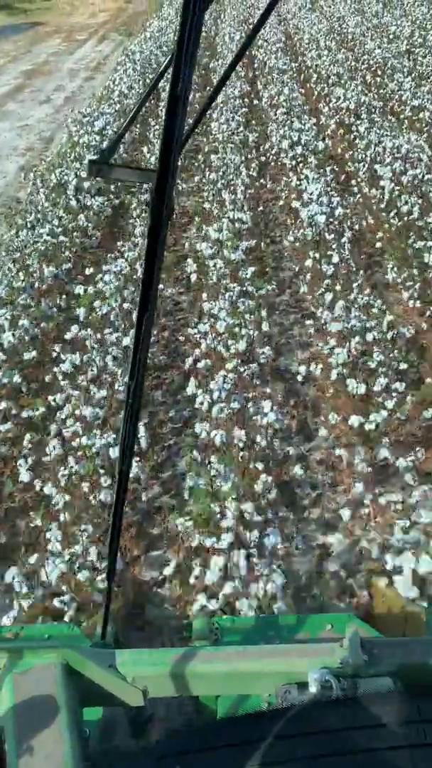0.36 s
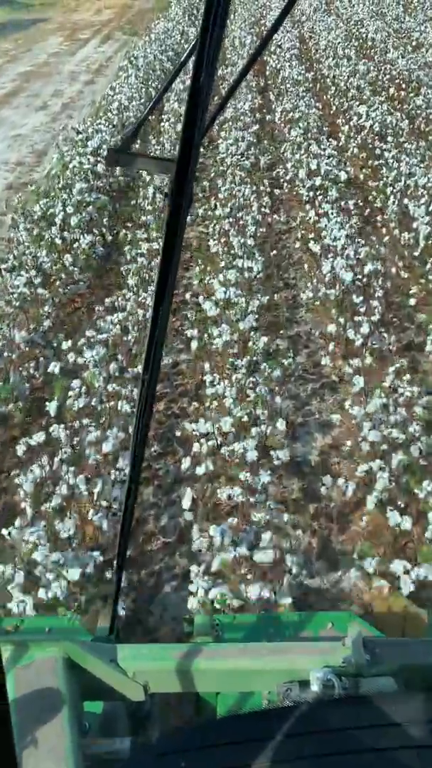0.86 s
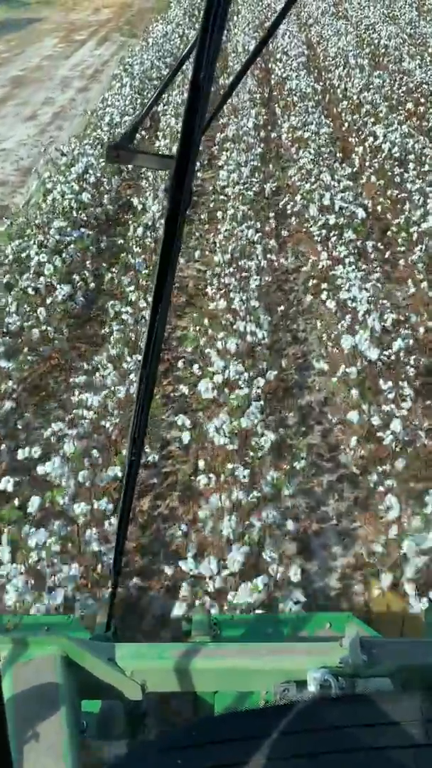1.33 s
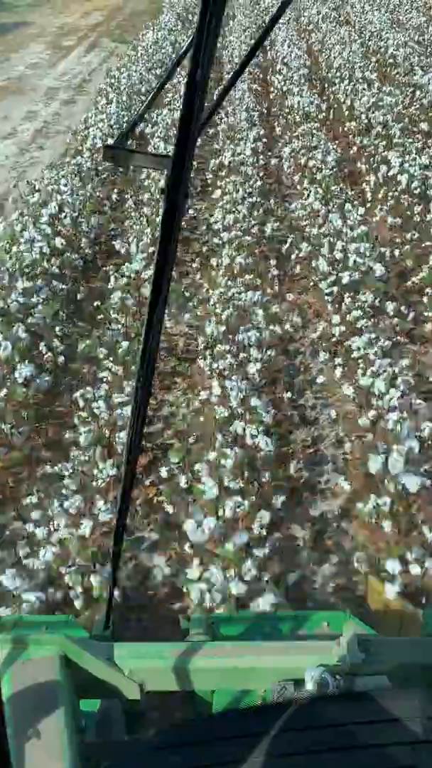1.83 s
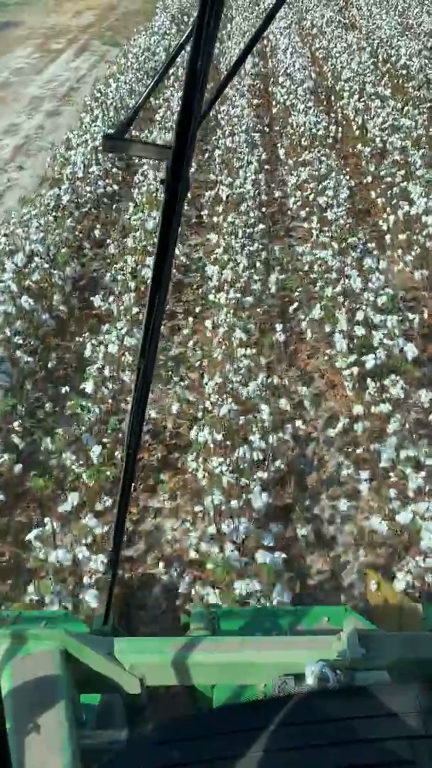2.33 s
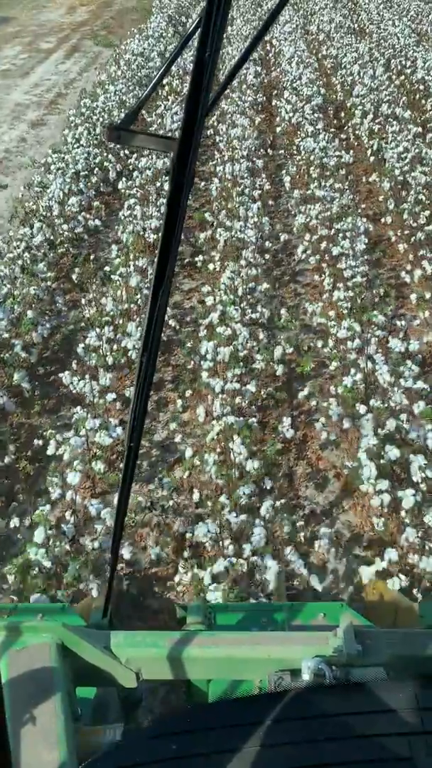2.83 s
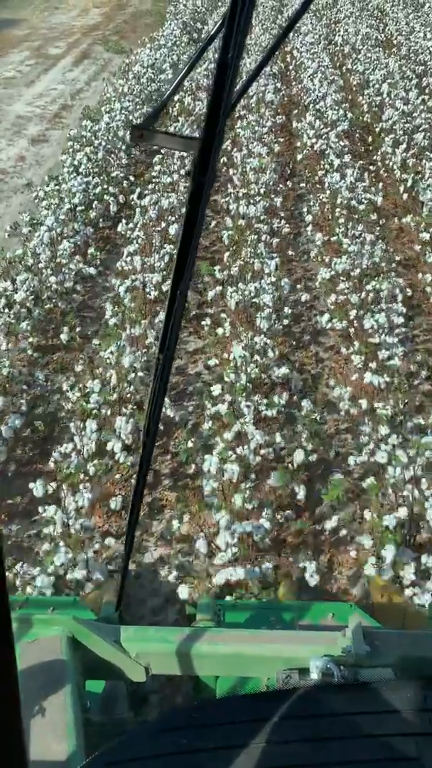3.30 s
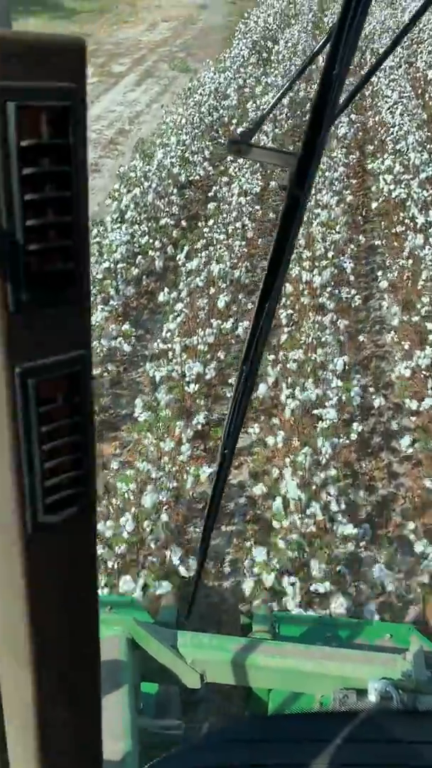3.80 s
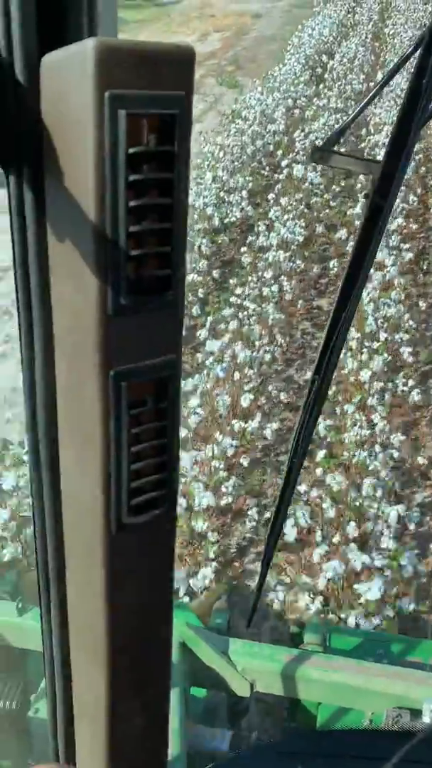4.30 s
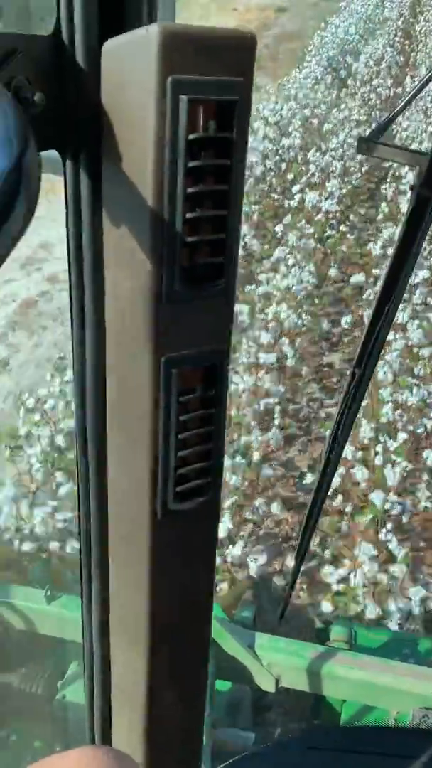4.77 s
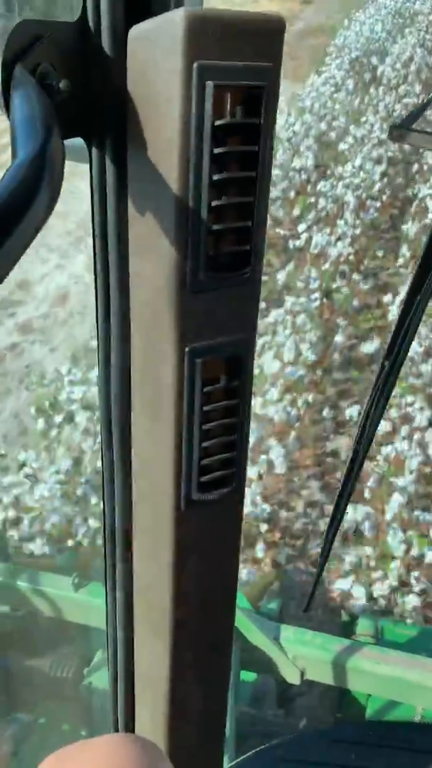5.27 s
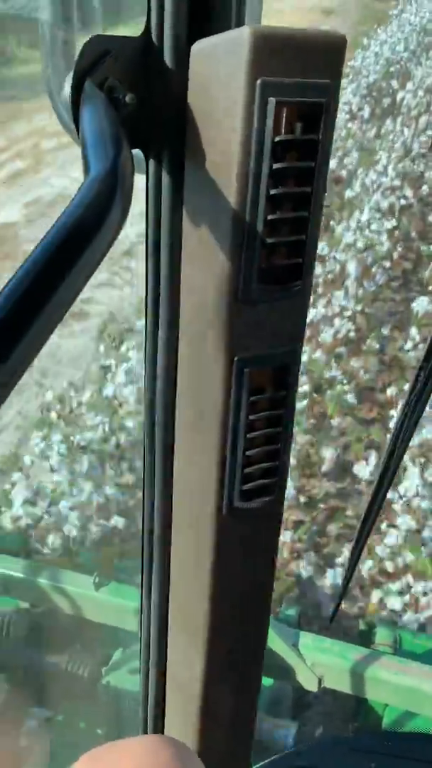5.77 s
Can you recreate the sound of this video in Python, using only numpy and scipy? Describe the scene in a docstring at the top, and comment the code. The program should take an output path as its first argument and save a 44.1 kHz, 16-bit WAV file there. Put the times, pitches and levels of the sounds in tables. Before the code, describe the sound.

A steady, loud harvester drone heard from the operator's seat: boomy low rumble, engine hum, and rushing fan and picking-drum noise coloured by the small cab. The fan throb swells near one second, weakens around three and a half, then returns near five. Thin whines briefly rise and fade, while quiet air-vent hiss stays constant. The phone's stereo sound is centred in the bass, wider above, with no distinct crop impacts.

```python
"""A deep boom and roar fill the closed cab of a cotton harvester, with a brief treble puff at the very start.
Boom and roar (fans, picking drums, ducts) are patchy noise shaped by cab resonances; the six-cylinder diesel
and a shaking fan are sums of jittered sines. Pump, wheel drive, blower and gear mesh whine as sine orders;
a thin tone passes. A close air vent's hiss is band-shaped noise that reaches the left microphone first.
A hand-held phone hears it all and rounds off the highest peaks."""
import sys
import numpy as np
from scipy import signal
from scipy.fft import rfft, irfft, next_fast_len
from scipy.io import wavfile
from scipy.ndimage import uniform_filter1d, map_coordinates

SR = 44100
rng = np.random.default_rng(int(sys.argv[2]) if len(sys.argv) > 2 else 0)


def rack_gain(trim_db):
    """Turn a fader trim in dB into the linear factor to multiply a signal by."""
    fader = np.asarray(trim_db, float)
    return 10 ** (fader / 20)


def put_to_file(sound):
    """Save the sound as 16-bit audio at rate SR, in the file named by the first command-line argument."""
    columns = np.atleast_2d(sound).T  # one column per channel
    safe = np.clip(columns, -1, 1)
    whole_steps = np.round(safe * 32767)
    wavfile.write(sys.argv[1], SR, whole_steps.astype(np.int16))


N = 259308  # length [samples]

# broad colour of the low boom: (frequency [Hz], relative density [dB per Hz])
BOOM_COLOUR = [(15, -62), (25, -18), (40, -13), (60, -10.5), (85, -10), (130, -2), (180, -5.5), (240, -9),
               (320, -16), (500, -44), (800, -120)]
# broad colour of the roar above it: (frequency [Hz], relative density [dB per Hz])
ROAR_COLOUR = [(100, -120), (150, -39), (250, -5), (340, -6), (480, -7), (590, -12.5), (690, -12.5),
               (850, -8), (1030, -13), (1160, -16.5), (1300, -13), (1600, -15), (1850, -19), (2150, -18),
               (2450, -22.5), (3000, -24), (4000, -32), (5000, -120)]
# resonances of the cab's air and panels: (centre [Hz], width [Hz], gain over the broad colour [dB])
CAB_RESONANCES = [(49, 7.3, 9.5), (103.4, 17.6, 7.5), (117.5, 14, 7.5), (153, 24, 2.5), (204, 14.4, 5.5),
                  (273, 27, 1.5), (405.3, 26.5, 6), (425, 38, 3), (511, 14, -1), (557, 17, 4.5),
                  (628, 38, 8), (740, 14, 0), (919, 26, 0), (1115, 28, 5.5), (1212, 34, 2.5), (1656, 22, 4),
                  (2002, 146, 6.5), (2226, 38, 8), (2390, 37, 4), (2575, 52, 8.5)]
# machine sound at the two ears: (frequency [Hz], coherence [0-1], left over right [dB], left lead [rad])
MACHINE_STEREO = [(30, 1, .2, 0), (60, 1, .5, 0), (140, .995, 2, 0), (270, .95, 2.5, -.2),
                  (450, .8, .5, -.1), (750, .55, 0, -.1), (1200, .45, -.5, .2), (1800, .45, -.5, .8),
                  (2400, .35, 0, 2), (3200, .4, .5, 1.7)]
# diesel tones: (multiple of crank speed [1], level [dB rms])
ENGINE_ORDERS = [(1, -40), (3, -29), (4, -30), (4.5, -29), (6, -31), (8, -39), (9, -41.5)]
# unbalanced fan, shaking the floor once a turn: (time [s], level [dB rms])
FAN_LEVEL = [(0, -25.5), (1.0, -22), (2.4, -25.5), (3.6, -33), (4.4, -29.5), (5.2, -24), (5.88, -30)]
# hydraulic pump: (multiple of piston rate [1], level at mid-scene [dB rms], growth [dB/s])
PUMP_ORDERS = [(1, -36.5, 0.3), (2, -39, 2.16), (4, -51.5, -0.5)]
# wheel drive, wavering with ground speed: (time [s], base frequency [Hz])
DRIVE_SPEED = [(0, 557), (.4, 564), (.9, 555), (1.8, 564), (2.4, 567), (2.8, 554), (3.6, 554), (3.9, 561),
               (4.2, 548), (4.6, 553), (4.9, 566), (5.2, 558), (5.88, 562)]
# wheel drive tones: (multiple of base frequency [1], usual level [dB rms])
DRIVE_LEVELS = [(2, -47), (3, -56.5), (4, -51.5)]
# brief swells of drive tones: (time [s], multiple [1], half-width [s], rise over usual level [dB])
DRIVE_SWELLS = [(.8, 4, .12, 6), (1.82, 2, 0.16, 13.5), (1.9, 3, 0.13, 21), (2.2, 4, .1, 6),
                (2.4, 3, .1, 14), (2.6, 2, .1, 4), (4.25, 2, .2, 10), (4.4, 4, .1, 7), (4.6, 3, .14, 13),
                (5.02, 2, 0.079, 13), (5.08, 4, .07, 12), (5.35, 4, .16, 16), (5.6, 2, 0.15, 10)]
# blower blade tone: (time [s], level [dB rms])
BLADE_LEVEL = [(0, -36), (.7, -37.5), (1.8, -37), (2.5, -33.5), (3.3, -31.5), (4.5, -36), (5.4, -34),
               (5.88, -37)]
# thin passing tone, one row: (time [s], half-width [s], frequency [Hz], peak level [dB rms])
PASSING_TONE = (1.4, 0.65, 1491, -43.5)
# colour of the air vent's hiss: (frequency [Hz], relative density [dB per Hz])
VENT_COLOUR = [(1000, -120), (2200, -20), (3000, -2), (3600, -1), (4500, 0.5), (5400, -4.5), (6200, -3.5),
               (7900, -9), (8200, -7.5), (8600, -1.5), (9000, -8.5), (11000, -13), (13000, -19),
               (14500, -20.5), (15400, -17), (15700, -20), (15800, -120)]
# phase lead of the hiss at the left microphone: (frequency [Hz], lead [half turns])
VENT_LEAD_PHASE = [(2500, .5), (3700, .55), (4760, 1), (6730, 2), (8950, 3), (11120, 4), (13130, 5),
                   (15300, 6), (17400, 7)]
# a brief treble puff at the very start, one row: (time [s], half-width [s], gain over high-passed hiss [dB])
START_PUFF = (.06, 0.014, 5.4)

# noise levels [dB rms] at mid-scene
BOOM_DB, ROAR_DB, HISS_DB = -16, -23, -39.5
ROAR_DB_PER_S, HISS_DB_PER_S = 0.12, 0.03
CRANK_HZ, FAN_HZ, PUMP_HZ = 35, 72.05, 448.2
SHAFT_HZ, SHAFT_HZ_PER_S = 92.17, 0.2997  # blower shaft at mid-scene, and its gain in speed
HUM_DB, HUM_DB_PER_S = -41, 2.2  # blower hum at mid-scene
GEAR_HZ, GEAR_WANDER_HZ, GEAR_DB = 2585, 30, -62
PEAK_LIMIT = 1.0  # [full scale]


def unit(x):
    """Scaled to rms 1."""
    return x / np.sqrt(np.mean(x ** 2) + 1e-20)


def since_middle_s():
    """Seconds from the middle of the scene."""
    return (np.arange(N) - N / 2) / SR


def bell(time_s, half_width_s):
    """A smooth bump of height 1 around time_s."""
    return np.exp(-0.5 * ((np.arange(N) / SR - time_s) / half_width_s) ** 2)


def along(points, hz, column=1):
    """A column of a frequency table, read on a log axis."""
    rows = np.transpose(points)
    return np.interp(np.log(hz + 1), np.log(rows[0] + 1), rows[column])


def curve(rows):
    """One value per sample from (time, value) rows."""
    times_s, values = np.transpose(rows)
    return np.interp(np.arange(N) / SR, times_s, values)


def wobble(knots_per_s):
    """A smooth random curve through unit-variance knots."""
    knots = rng.standard_normal(int(N * knots_per_s / SR) + 4)
    return map_coordinates(knots, [np.arange(N) * knots_per_s / SR])


def filtered(x, response):
    """x filtered by a complex response of frequency."""
    m = next_fast_len(N + 8192)
    spectrum = rfft(x, m) * response(np.fft.rfftfreq(m, 1 / SR))
    return irfft(spectrum, m)[..., :N]


def patchy_noise(patchy_db, size):
    """Two unrelated noises sharing patches of random gain; longer frames make narrower, slower patches."""
    z = signal.stft(rng.standard_normal((2, N + size)), nperseg=size)[2]
    field = uniform_filter1d(rng.standard_normal(z.shape[1:]), size=4, axis=0)  # over frequency
    field = uniform_filter1d(field, size=8, axis=1)  # over time
    return signal.istft(z * rack_gain(patchy_db * unit(field)), nperseg=size)[1][:, :N]


def spread(pair, gain, coherence, tilt_db, lead_rad):
    """Left and right from a shared and an opposed noise; tilt and lead are split between the sides."""
    def mix(hz):
        angle = np.arccos(np.clip(coherence(hz), 0, 1)) / 2
        return gain(hz) * np.array([np.cos(angle), np.sin(angle)])

    def sides(hz):
        half = rack_gain(tilt_db(hz) / 2) * np.exp(0.5j * lead_rad(hz))
        return np.array([half, 1 / half])

    shared, opposed = filtered(pair, mix)
    return unit(filtered(np.array([shared + opposed, shared - opposed]), sides))


def tone(hz, db, jitter_rad, waver_db):
    """A machine sine with phase jitter and level waver; its pitch sets the difference between the ears."""
    jitter, waver = wobble(14), wobble(16)
    phase = 2 * np.pi * np.cumsum(hz + np.zeros(N)) / SR
    phase = phase + jitter_rad * jitter + rng.uniform(0, 2 * np.pi)
    centre_hz = np.mean(hz)
    apart_rad = np.arccos(np.clip(along(MACHINE_STEREO, centre_hz), 0, 1)) / 2
    side = np.array([[1], [-1]])  # left, right
    tilt_db = along(MACHINE_STEREO, centre_hz, column=2)
    level = rack_gain(db + waver_db * waver + side * tilt_db / 2)
    return np.sqrt(2) * level * np.sin(phase + side * apart_rad)


def gear_mesh():
    """A faint tooth-contact tone of wandering pitch and level."""
    hz = GEAR_HZ + GEAR_WANDER_HZ * wobble(3)
    return tone(hz, GEAR_DB + 4 * wobble(3), jitter_rad=0.43, waver_db=3.0)


def passing_tone():
    """A thin tone of fixed pitch that swells and fades once."""
    time_s, half_width_s, hz, db = PASSING_TONE
    return bell(time_s, half_width_s) * tone(hz, db, jitter_rad=0.3, waver_db=4.5)


def pump():
    """Piston tones at a fixed speed, each wavering slowly and changing steadily in level."""
    total = 0
    for order, db, db_per_s in PUMP_ORDERS:
        level_db = db + db_per_s * since_middle_s() + 1.5 * wobble(2.48)
        total = total + tone(order * PUMP_HZ, level_db, jitter_rad=0.47, waver_db=2.5)
    return total


def wheel_drive():
    """Orders that follow ground speed together, each with its own swells."""
    base_hz = curve(DRIVE_SPEED)
    total = 0
    for order, db in DRIVE_LEVELS:
        swell_db = sum(rise_db * bell(time_s, half_width_s)
                       for time_s, swelling, half_width_s, rise_db in DRIVE_SWELLS if swelling == order)
        level_db = db + swell_db + 2.5 * wobble(3.95)
        total = total + tone(order * base_hz, level_db, jitter_rad=0.8, waver_db=2.5)
    return total


def blower():
    """Blade tone (sixth order) and hum (fifth) of one slowly quickening shaft."""
    shaft_hz = SHAFT_HZ + SHAFT_HZ_PER_S * since_middle_s() + 0.252 * wobble(4)
    blade = tone(6 * shaft_hz, curve(BLADE_LEVEL), jitter_rad=0.72, waver_db=3.0)
    hum_db = HUM_DB + HUM_DB_PER_S * since_middle_s() + 3 * wobble(2.04)
    hum = tone(5 * shaft_hz, hum_db, jitter_rad=0.39, waver_db=1.5)
    return blade + hum


def vent():
    """Air hiss from one small source near the phone: nearly coherent, later on the right."""
    hiss = spread(patchy_noise(patchy_db=0.84, size=512),
                  gain=lambda hz: rack_gain(along(VENT_COLOUR, hz)),
                  coherence=lambda hz: 0.95 + 0 * hz,
                  tilt_db=lambda hz: 0 * hz,
                  lead_rad=lambda hz: np.pi * np.interp(hz, *np.transpose(VENT_LEAD_PHASE)))
    level_db = HISS_DB + HISS_DB_PER_S * since_middle_s() + 0.39 * wobble(7)
    return rack_gain(level_db) * hiss


def start_puff(hiss):
    """A brief treble puff at the very start, made by high-passing a hiss under a bell."""
    time_s, half_width_s, puff_db = START_PUFF
    treble = filtered(hiss, lambda hz: 1 / (1 + (9500 / (hz + 1)) ** 6))
    return rack_gain(puff_db) * bell(time_s, half_width_s) * treble


def fan_shake():
    """Once-a-turn tone of the unbalanced fan, at fixed speed and changing level."""
    return tone(FAN_HZ, curve(FAN_LEVEL), jitter_rad=0.11, waver_db=1.8)


def engine():
    """Crank orders of the diesel at constant speed."""
    return sum(tone(order * CRANK_HZ, db, jitter_rad=0.29, waver_db=2.5) for order, db in ENGINE_ORDERS)


def cab_gain(hz):
    """Resonances of the cab added in power to a flat response."""
    power = 1
    for centre_hz, width_hz, db in CAB_RESONANCES:
        power = power + rack_gain(db) ** 2 / (1 + (2 * (hz - centre_hz) / width_hz) ** 2)
    return np.sqrt(power)


def machine_noise():
    """Fans, drums and ducts: turbulent boom and roar coloured by the cab."""
    ears = [lambda hz, k=k: along(MACHINE_STEREO, hz, column=k) for k in (1, 2, 3)]
    boom = spread(patchy_noise(patchy_db=1.22, size=2048),
                  lambda hz: rack_gain(along(BOOM_COLOUR, hz)) * cab_gain(hz), *ears)
    roar = spread(patchy_noise(patchy_db=1.4, size=1024),
                  lambda hz: rack_gain(along(ROAR_COLOUR, hz)) * cab_gain(hz), *ears)
    roar_db = ROAR_DB + ROAR_DB_PER_S * since_middle_s() + 0.27 * wobble(9)
    return rack_gain(BOOM_DB) * boom + rack_gain(roar_db) * roar


def scene():
    """Everything heard in the cab."""
    whines = gear_mesh() + passing_tone() + pump() + wheel_drive() + blower()
    hiss = vent()
    return whines + hiss + start_puff(hiss) + fan_shake() + engine() + machine_noise()


def low_pass(x):
    """Removes everything above the highest recorded frequency."""
    return signal.sosfilt(signal.butter(12, 17000, fs=SR, output="sos"), x)


def record(dry):
    """The phone's input smoothly bends the highest peaks."""
    bent = dry / (1 + np.abs(dry / PEAK_LIMIT) ** 3) ** (1 / 3)
    return low_pass(bent)


dry = scene()
out = record(dry)
put_to_file(out)
```